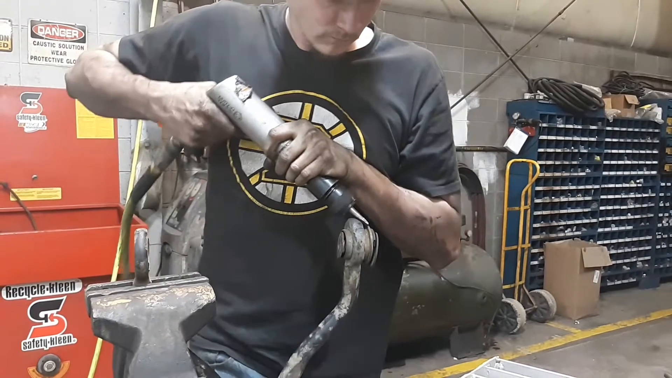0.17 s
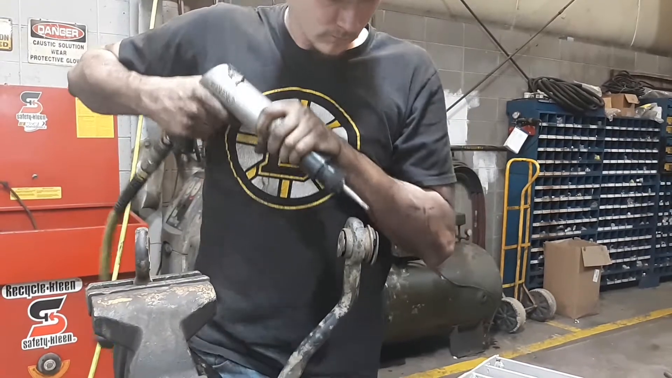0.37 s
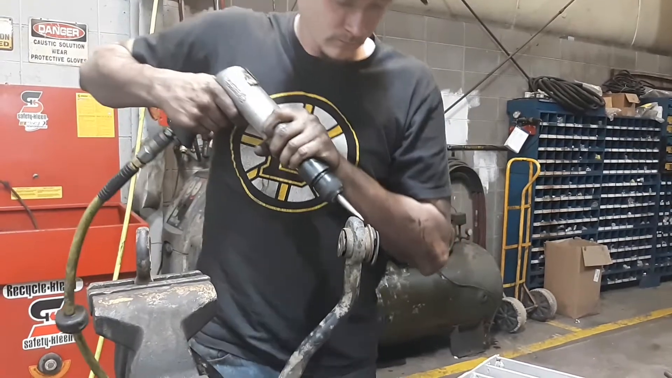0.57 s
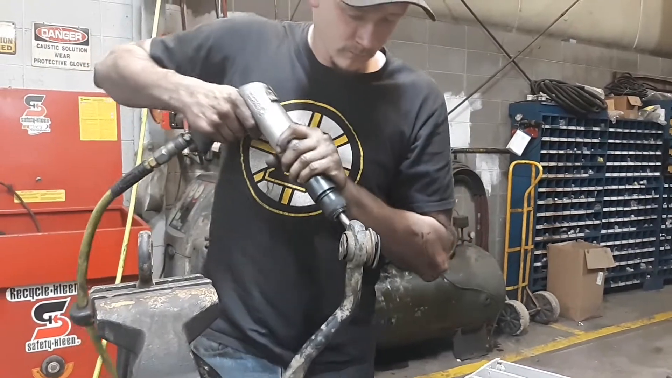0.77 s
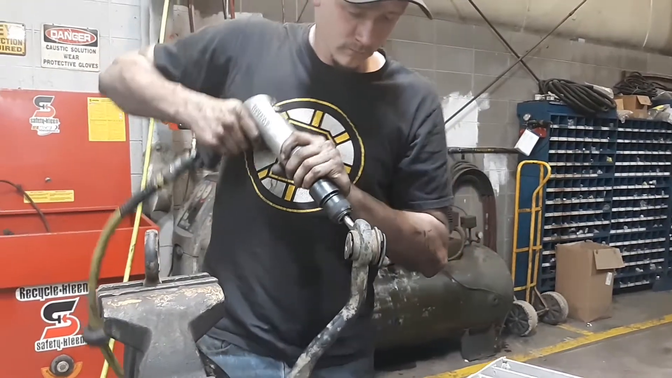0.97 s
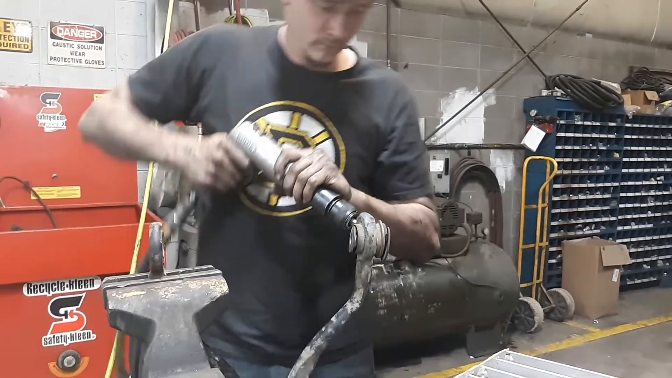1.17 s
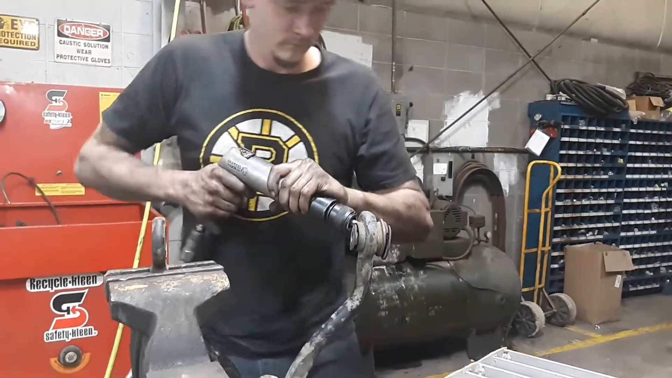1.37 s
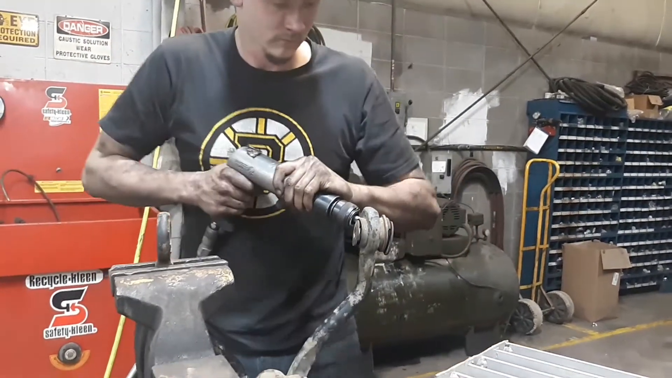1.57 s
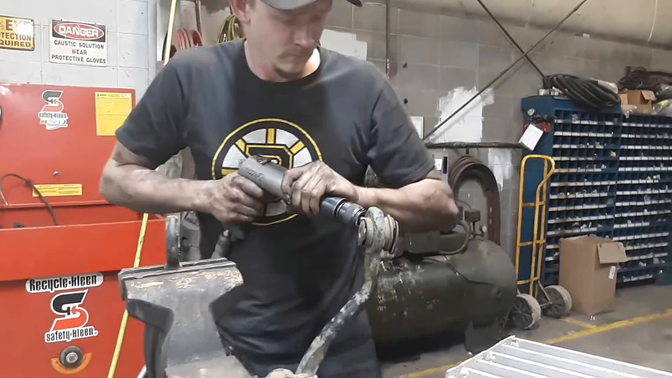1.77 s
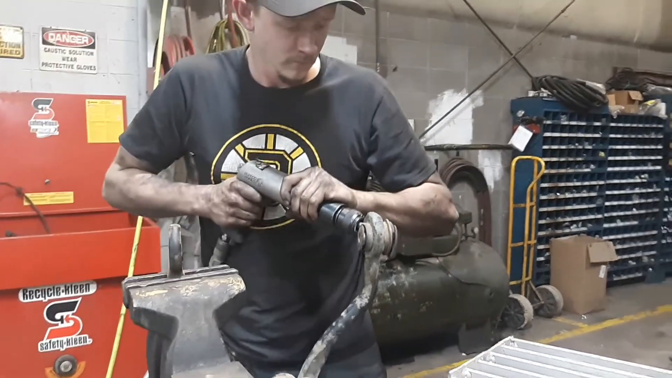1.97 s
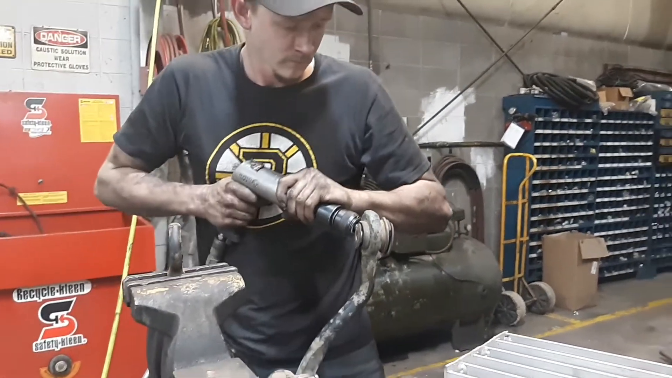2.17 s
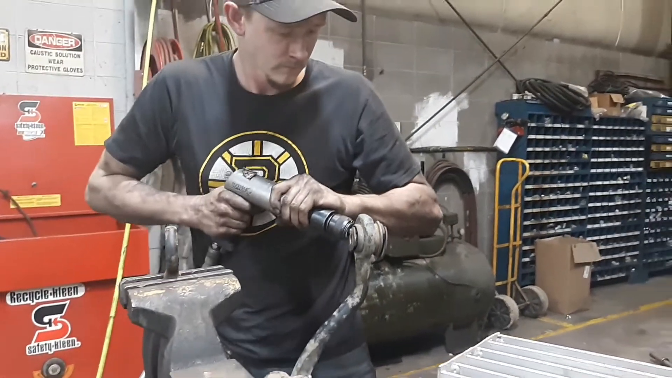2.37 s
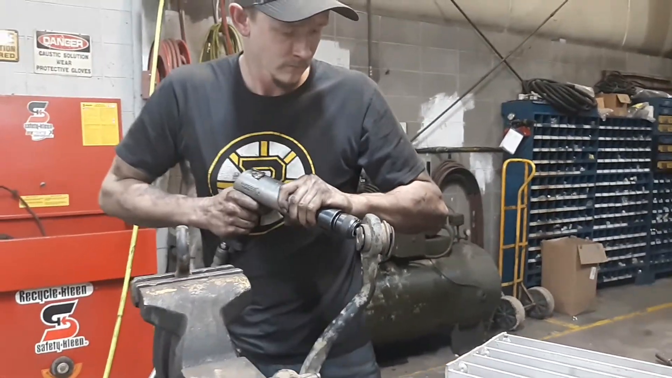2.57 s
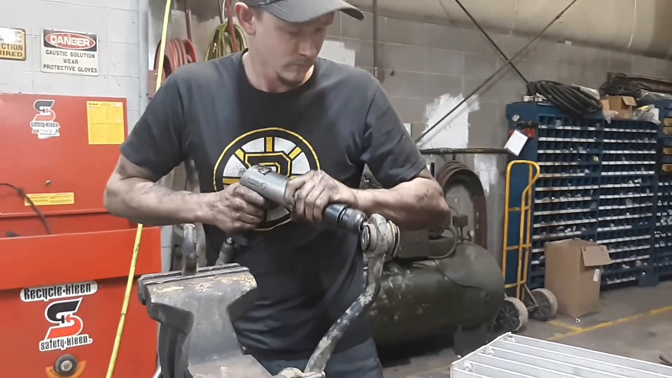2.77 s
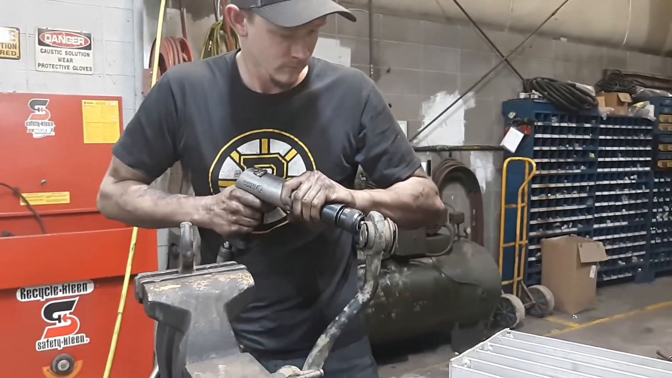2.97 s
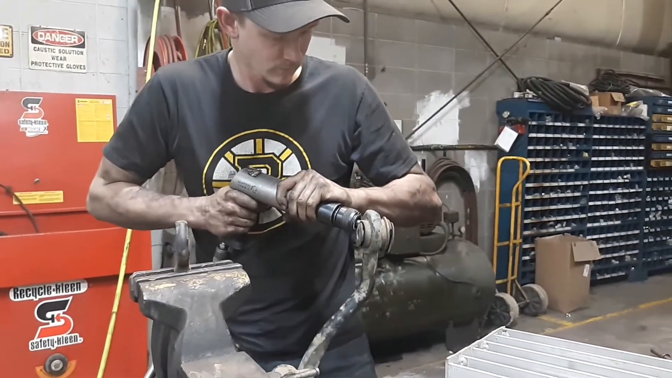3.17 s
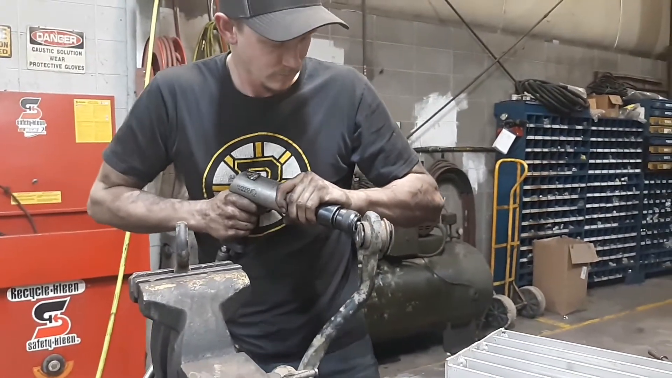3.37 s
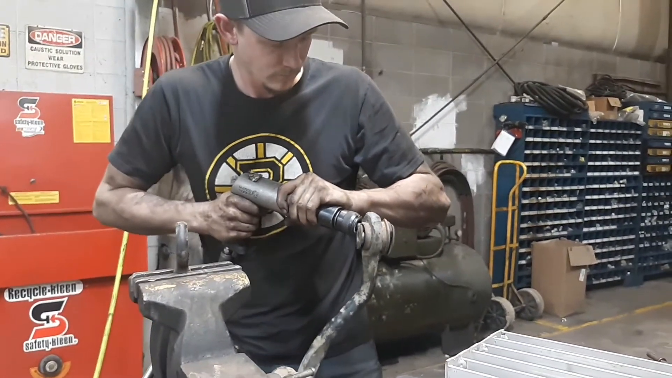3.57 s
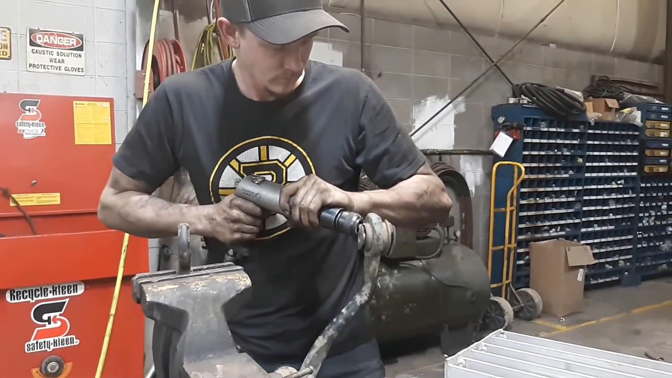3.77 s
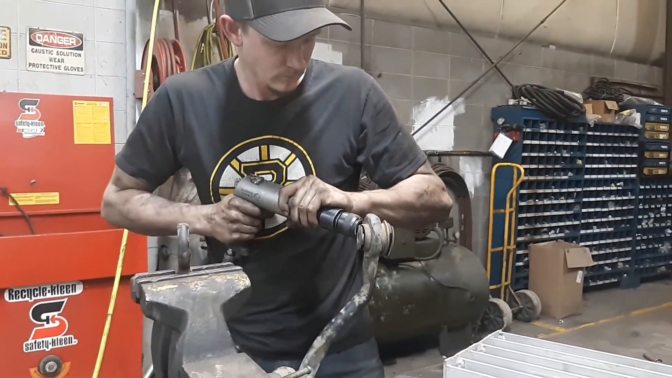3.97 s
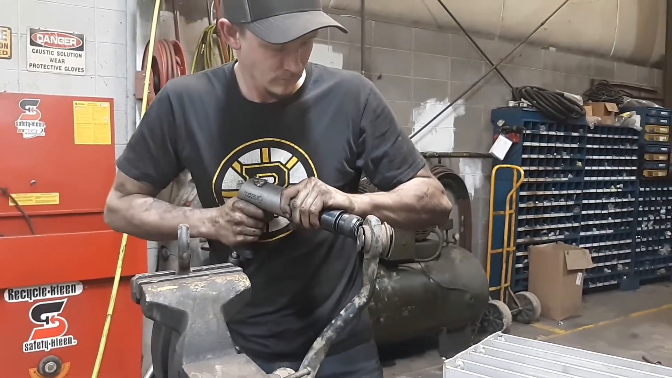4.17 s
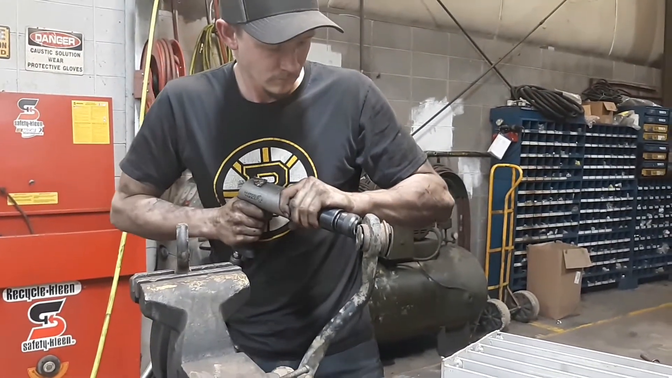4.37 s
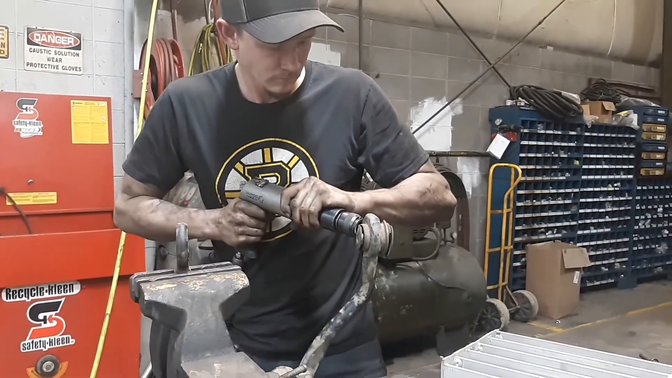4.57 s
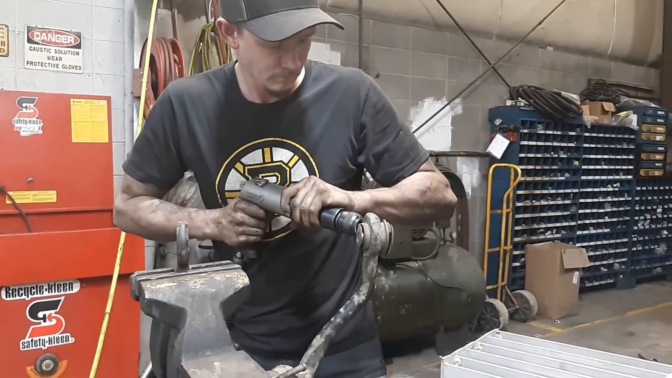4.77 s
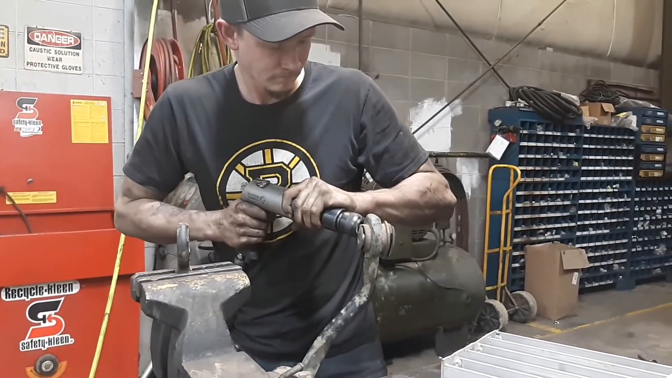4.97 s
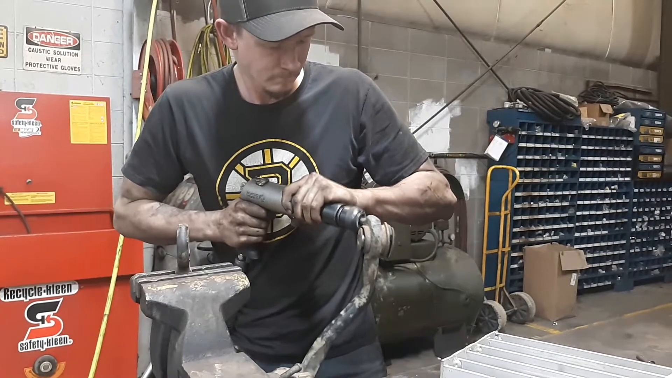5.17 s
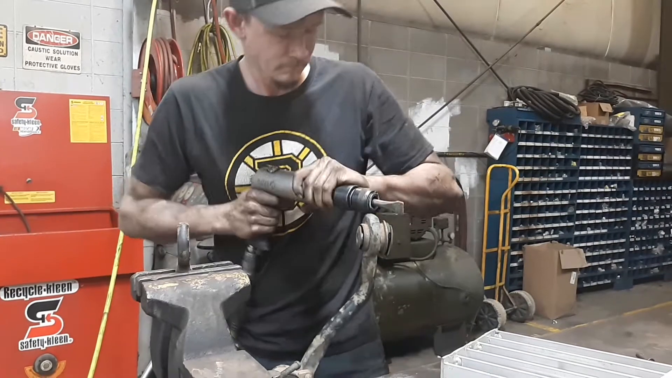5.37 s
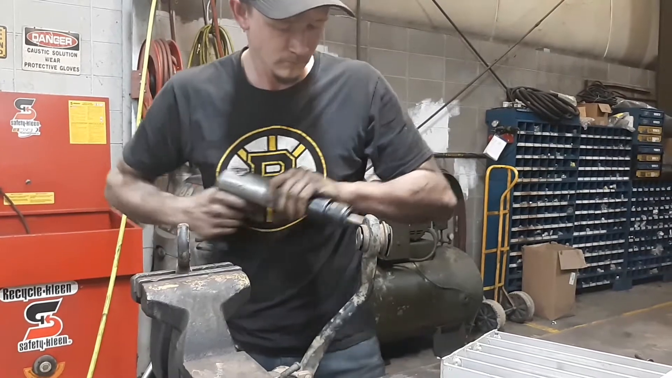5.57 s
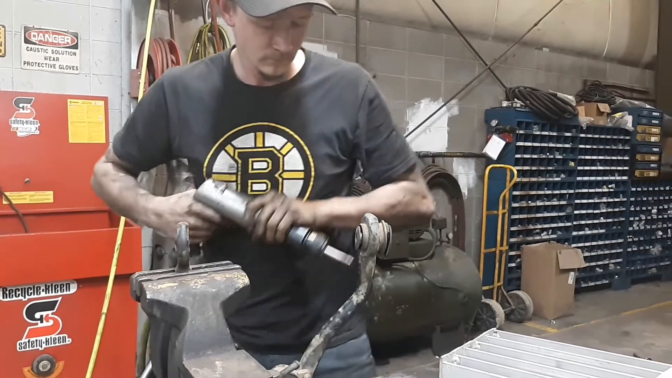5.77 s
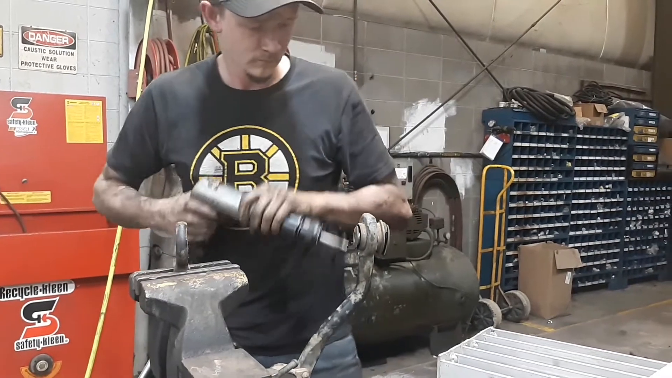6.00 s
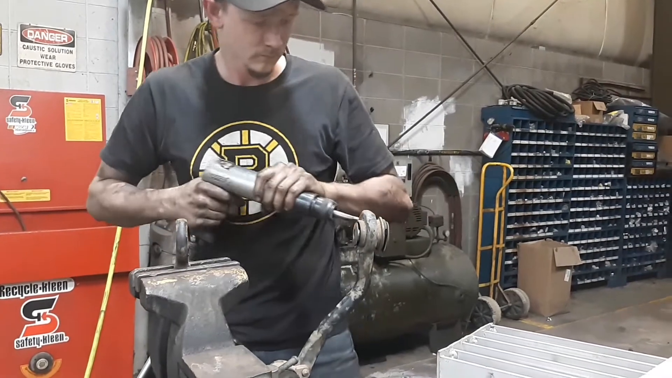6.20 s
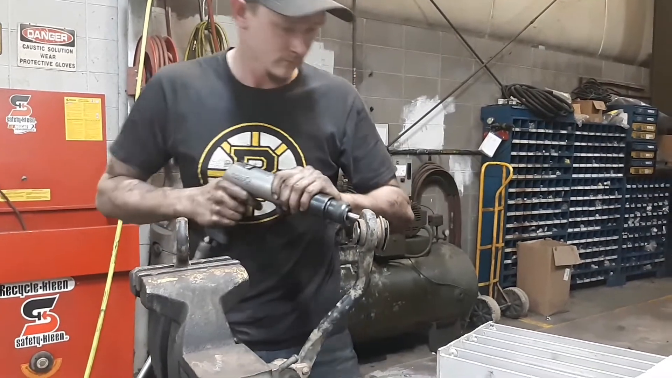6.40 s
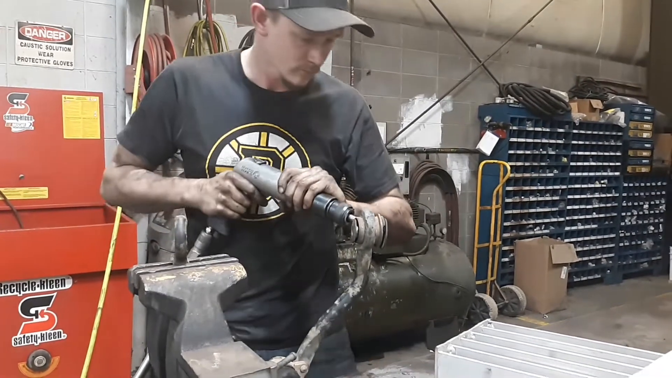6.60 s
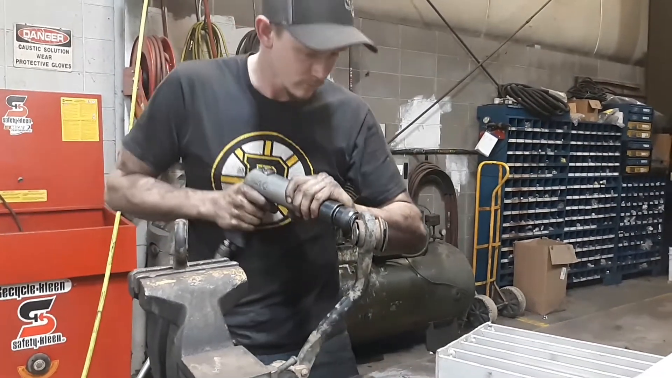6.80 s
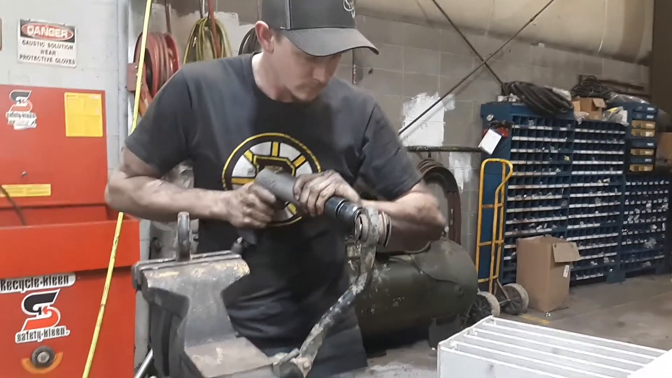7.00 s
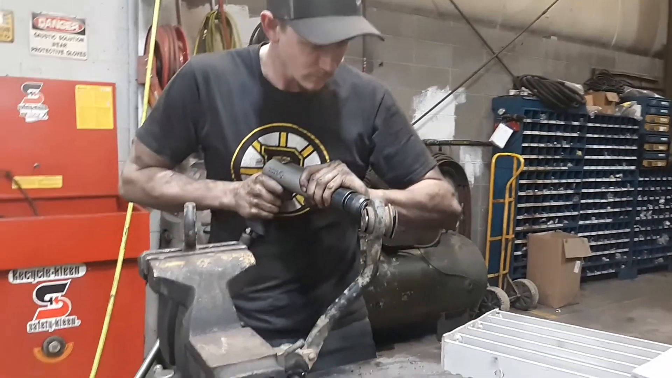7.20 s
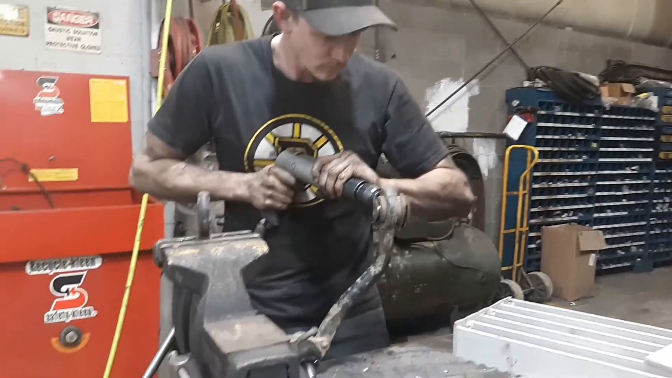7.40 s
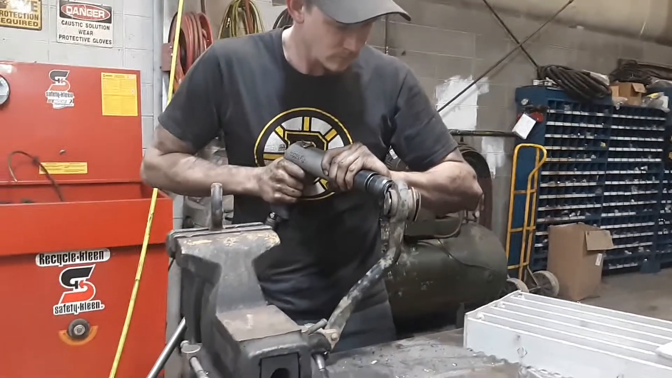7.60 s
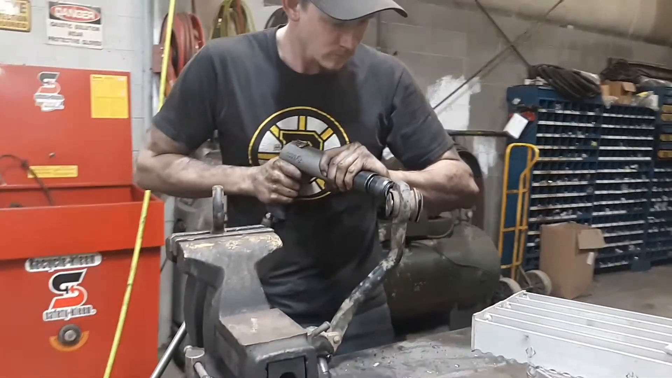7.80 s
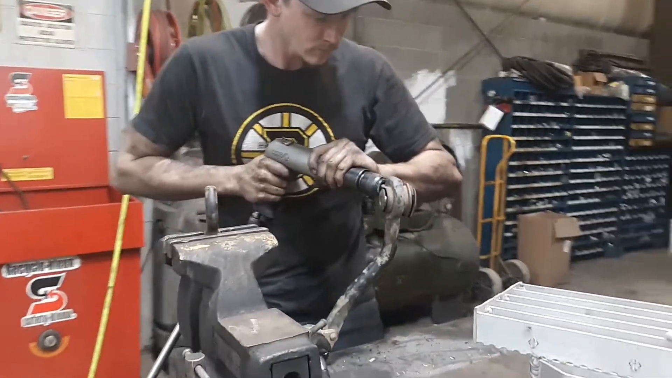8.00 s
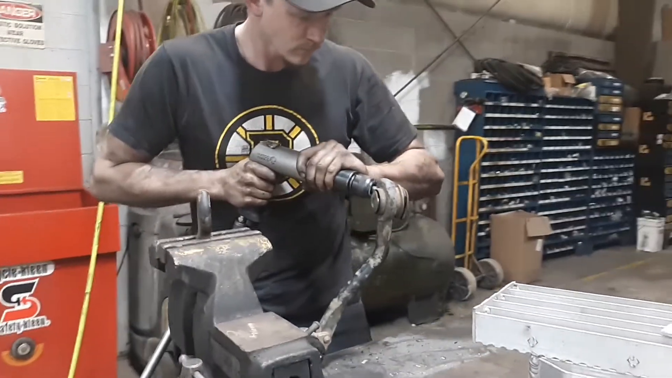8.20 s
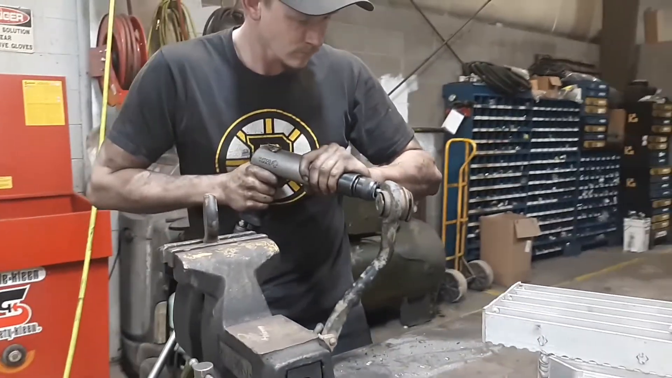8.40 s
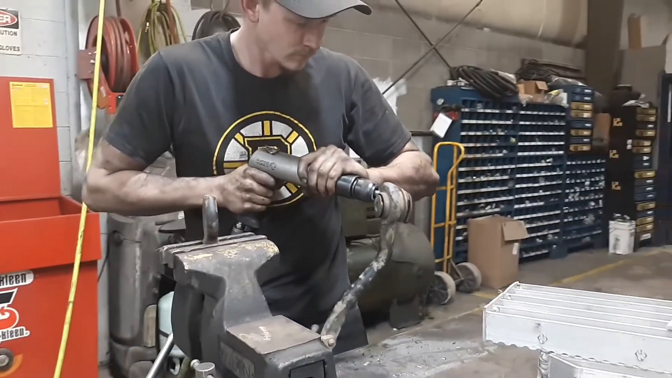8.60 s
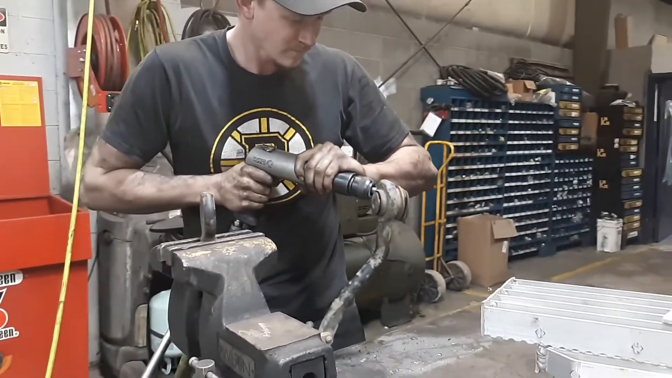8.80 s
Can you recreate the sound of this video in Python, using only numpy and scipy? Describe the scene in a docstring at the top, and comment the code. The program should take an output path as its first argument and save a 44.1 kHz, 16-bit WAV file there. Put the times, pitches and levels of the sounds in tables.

```python
"""Air hammer in a garage

An air hammer drives a worn bushing out of a steel control arm held in a vice, in runs of about 33 blows
a second. Each impact cracks, excites the modes of the chisel and, once the chisel bites, of the arm; a
puff of exhaust follows. Hard walls reverberate. Between runs the chisel is set back on the steel, and
after a second of quiet the camera's gain control lifts the hum of the shop and a thin whistle."""
import sys
import numpy as np
from scipy import signal
from scipy.fft import rfft, irfft, next_fast_len
from scipy.io import wavfile
from scipy.ndimage import uniform_filter1d, minimum_filter1d, map_coordinates

SR = 44100
rng = np.random.default_rng(int(sys.argv[2]) if len(sys.argv) > 2 else 0)


def persist_wave(psi):
    """Save psi, clipped to +-1, as 16-bit WAV."""
    counts = np.round(np.clip(psi, -1, 1) * 32767).astype(np.int16)
    wavfile.write(sys.argv[1], SR, np.atleast_2d(counts).T)


N = 390285
TIME = np.arange(N) / SR
AGE = np.arange(SR // 6) / SR  # seconds since a blow


# Volleys of blows. Each row: first and last blow in seconds, blows per second, share by which the stroke
# lengthens, force in dB, bite from 0 (running free) to 1 (hard on the steel), first and last ring in dB.
VOLLEYS = [(0.002, 0.058, 35, 0, -13.5, .88, -25, -25), (1.889, 1.965, 29, -.3, -13.5, 0, -20, -20),
           (1.981, 2.012, 27, 0, -14.5, 0.8, -34.5, -35), (2.041, 2.194, 26, -.06, -16, .98, -24, -27),
           (2.227, 2.326, 30, 0, -18, .92, -13, -12), (3.212, 3.272, 32, 0, -21, .2, -31, -36),
           (3.301, 3.358, 33, 0, -17.5, .83, -17, -20), (3.391, 3.391, 33, 0, -21, .1, -36, -36),
           (3.421, 3.907, 33, 0, -16.8, .86, -13, -9), (4.278, 4.343, 30, -.3, -21.5, 0.03, -26.5, -28),
           (4.363, 4.64, 31, .24, -18, .87, -7, -17), (4.695, 4.67, 33, 0, -21, .15, -29, -29),
           (4.720, 4.84, 33, 0, -16, .83, -8.5, -9), (4.783, 5.22, 35, 0, -16.5, .87, -7, -15.5),
           (5.240, 5.269, 35, 0, -18, .55, -31, -34), (7.402, 7.476, 28, -.3, -15.2, 0.05, -24, -29),
           (7.494, 7.55, 25, .7, -14, 0.99, -1, -11), (7.740, 7.85, 32, 0, -21, 0.01, -32, -23),
           (7.857, 8.12, 28, -.04, -16.3, .9, -13, -14), (8.145, 8.79, 35, -.02, -15.6, .88, -17, -15)]
# Kicks of the piston after the trigger is let go. Each row: time in seconds, force in dB.
AFTER_KICKS = [(0.134, -32.5), (2.382, -27.5), (5.291, -20), (5.330, -22), (5.400, -31)]
# Standard deviations from blow to blow, in dB: crack, chisel ring, clang, exhaust.
SCATTER_DB = [1.5, 2.5, 1.2, 1.3]

def piston():
    """A nearly periodic impact train. Each row: time in seconds, then crack, ring, clang, air in dB."""
    kicks = [(s, db, db - 14, db - 16, db - 23) for s, db in AFTER_KICKS]
    blows = np.vstack([volley(*row) for row in VOLLEYS] + kicks)
    blows = blows[np.argsort(blows[:, 0])]
    valve_shut = np.diff(blows[:, 0], append=N / SR) > .052  # less air escapes before a pause
    blows[:, -1] -= 11 * valve_shut
    jitter_s = .0004
    return blows + rng.standard_normal(blows.shape) * [jitter_s, *SCATTER_DB]


def volley(first, last, rate, slowing, force_db, bite, ring_first_db, ring_last_db):
    """Mechanical coupling: the harder the chisel bites, the more the arm clangs and the less air escapes."""
    progress = np.linspace(0, 1, 1 + round(abs(last - first) * rate))
    times = first + (last - first) * (progress + slowing * progress * (progress - 1) / 2)
    from_rest = (progress == 0) * (1 - bite)  # a free piston's first stroke is weaker
    crack_db = force_db - 6 * from_rest
    ring_db = ring_first_db + (ring_last_db - ring_first_db) * progress
    clang_db = force_db - 30 + 29 * bite
    air_db = force_db + 1 - 7.8 * bite - 3 * from_rest
    return np.column_stack(np.broadcast_arrays(times, crack_db, ring_db, clang_db, air_db))


# Spectrum of the impact. Each row: frequency in Hz, relative density in dB.
CRACK_SPECTRUM = [(100, -31.5), (300, 5.5), (800, -10), (1600, -3), (2500, -3.5), (4200, 0.5), (6500, -2),
                  (7800, -9.5), (9600, -7), (11000, -9), (13000, -6), (16000, -23)]
# Shank note, freed when the chisel sits askew. Each row: time in seconds, relative level in dB.
SHRILL_LEVEL = [(0, -21), (2.2, -2.5), (5.3, -14), (7.75, -10), (7.95, 4), (8.45, -3.5), (8.8, -10)]

def cracks(blows):
    """Brief contact gives a broad spectrum: the piston hits the shank and taps again on the rebound."""
    times, db = blows.T[:2]
    strike = place(times, db + 10, bursts(CRACK_SPECTRUM, times) * fade(attack=.00055, t60=.033))
    rebound = place(times + .018, db - 9.5, bursts(CRACK_SPECTRUM, times) * fade(attack=.0005, t60=.014))
    shrill_hz = 9700 * (1 + .012 * rng.standard_normal((len(times), 1)))
    shrill = np.sin(2 * np.pi * shrill_hz * AGE) * fade(attack=.0019, t60=.048)
    return strike + rebound + place(times, db + curve(SHRILL_LEVEL, times) + 3.5, shrill)


# The chisel's main note, higher when pressed in deep. Each row: time in seconds, frequency in Hz.
CHISEL_PITCH = [(0, 3890), (2.3, 4010), (3.4, 3965), (5.2, 3961), (7.5, 3952), (8.0, 4080), (8.8, 4082)]
# The note is choked sooner as the tip sinks in. Each row: time in seconds, lifetime in seconds.
CHISEL_LIFE = [(2.3, .007), (5.2, .0075), (7.5, .007), (8.05, .006), (8.3, .004), (8.85, .004)]
# Modes of the chisel. Each row: multiple of the main note, relative level in dB.
CHISEL_MODES = [(1, 2), (2.44, -23), (3.24, -30.5)]

def chisel(blows):
    """Longitudinal vibration of a bar: each blow starts it, and contact with the bushing damps it."""
    times, _, db = blows.T[:3]
    detune, grip = rng.standard_normal((len(times), 2)).T[:, :, None]
    hz = curve(CHISEL_PITCH, times)[:, None] * (1 + .007 * detune)
    life_s = curve(CHISEL_LIFE, times)[:, None] * np.exp(.15 * grip)
    envelope = np.exp(-(AGE / life_s) ** 3) * (1 - np.exp(-AGE / .0008))
    ring = sum(amp(level) * np.sin(2 * np.pi * ratio * hz * AGE) for ratio, level in CHISEL_MODES)
    return place(times, db + 7.7, ring * envelope)


# Modes of arm and vice. Each row: frequency in Hz, relative level in dB, 60 dB decay time in seconds.
ARM_MODES = [(466, -9.5, .05), (650, -15.5, 0.016), (857, -5.5, .05), (921.3, -0.5, .07), (1007, -4, 0.084),
             (1123, -13, 0.062), (1238, -13.5, .05), (1402, -4, 0.032), (1623, -3.5, 0.045),
             (1739, -7, 0.06)]
# How freely the arm rings in the vice. Each row: time in seconds, gain in dB.
ARM_FREEDOM = [(0, -15.5), (2.1, -1), (8.0, 0.5), (8.8, -3)]
# Spectrum of chattering steel. Each row: frequency in Hz, relative density in dB.
CLATTER_SPECTRUM = [(40, -45), (110, -24.5), (200, -14), (480, -6), (700, -3), (950, 1.5), (1700, -3),
                    (2200, -5.5), (3300, -1.5), (6000, -23.5), (12000, -33)]

def control_arm(blows):
    """Damped modal vibration: the arm's clang and chatter are heard a few milliseconds after each blow."""
    times, _, _, db = blows.T[:4]
    clang = 0
    for k, (hz, level, t60) in enumerate(ARM_MODES):
        strength, detune = rng.standard_normal((len(times), 2)).T[:, :, None]
        mode = (-1) ** k * np.sin(2 * np.pi * hz * (1 + .014 * detune) * AGE)
        clang = clang + amp(level + 2.22 * strength) * fade(.0011, t60) * mode
    chatter = bursts(CLATTER_SPECTRUM, times) * fade(attack=.0017, t60=.074)
    lag_s = .008 + .002015 * rng.standard_normal(len(times))
    clang_db = db + curve(ARM_FREEDOM, times) + 5
    return place(times + lag_s, clang_db, clang) + place(times + .003, db + 7.5, chatter)


# Spectra of the exhaust's hiss, thump and shriek. Each row: frequency in Hz, relative density in dB.
HISS_SPECTRUM = [(40, -61.5), (130, -18), (260, -9.5), (450, -15), (900, -18.5), (1400, -12), (2600, -6),
                 (4200, 5.5), (5300, -3), (6600, -0.5), (7700, -19.5), (9400, -13), (12000, -9.5),
                 (16000, -8.5)]
THUMP_SPECTRUM = [(40, -46), (90, -23), (170, -1), (260, 6.5), (400, -5), (700, -18.5), (2000, -44.5)]
JET_SPECTRUM = [(1500, -32.5), (2800, -13.5), (3400, -8.5), (4300, 1.5), (5500, -2.5), (6500, -2),
                (7500, -23), (12000, -23)]

def exhaust(blows):
    """Pulsed jet noise: the ports open with a thump on the return stroke and hiss until they close."""
    times, _, _, _, db = blows.T
    gap_s = np.diff(times, append=np.inf)
    stroke_s = np.where(gap_s < .05, gap_s, .03)[:, None]
    port_open = np.clip(AGE / .003, 0, 1) * np.clip((stroke_s - .004 - AGE) / .003, 0, 1)
    hiss = bursts(HISS_SPECTRUM, times) * port_open
    thump = bursts(THUMP_SPECTRUM, times) * fade(attack=.0025, t60=.029)
    jet = bursts(JET_SPECTRUM, times) * port_open
    jet_db = np.minimum(2 * db + 13, -16)  # grows faster than the flow, so a free piston shrieks
    return place(times, db + 3, hiss) + place(times, db + .5, thump) + place(times, jet_db, jet)


def loose_steel():
    """Free vibration: loose steel sings on after the second run and fades unevenly."""
    age = np.maximum(TIME - 2.293, 0)
    flutter = amp(4 * wobble(40))
    return amp(-35) * flutter * np.sin(2 * np.pi * 5453 * age) * fade(attack=.003, t60=.7, t=age)


# The tool is set on the work. Each row: time in seconds, relative levels of click, clank, knock in dB.
TAPS = [(0.532, -57, -75, -78), (0.616, -58, -75, -78), (1.095, -64, -54, -67), (1.158, -43, -55, -48),
        (1.183, -48, -49, -49), (1.535, -63, -65, -45), (2.848, -49.5, -54, -57), (6.412, -71, -52, -59),
        (6.658, -50, -46.5, -65), (6.705, -42.5, -45, -46), (6.739, -41, -40, -56),
        (6.816, -55.5, -62, -65), (7.314, -75, -58, -54)]
# Spectra of the click and the knock. Each row: frequency in Hz, relative density in dB.
CLICK_SPECTRUM = [(200, -28.5), (1000, -0.5), (2200, -4), (3700, 5.5), (5200, -4.5), (6500, -5),
                  (8000, -20.5), (10000, -12.5), (16000, -31)]
KNOCK_SPECTRUM = [(50, -37.5), (170, -5), (350, -3), (650, -0.5), (1100, -17.5), (2000, -25), (6000, -48)]

def taps():
    """Light contacts excite short transients: a steel click, a clank and a dull knock of the arm."""
    times, click_db, clank_db, knock_db = np.transpose(TAPS)
    click = place(times, click_db + 6.5, bursts(CLICK_SPECTRUM, times) * fade(attack=.0004, t60=.022))
    clank = place(times, clank_db + 2.5, bursts(CLATTER_SPECTRUM, times) * fade(attack=.001, t60=.06))
    knock = place(times, knock_db - 2.5, bursts(KNOCK_SPECTRUM, times) * fade(attack=.0023, t60=.35))
    return click + clank + knock


# A thin whistle. Each row: time in seconds, level in dB.
WHISTLE_LEVEL = [(0.6, -71), (1.0, -66), (1.7, -62.5), (3.2, -63.5), (5.9, -78), (6.87, -66.5), (7.08, -68),
                 (7.16, -79)]

def whistle():
    """Random modulation of phase and amplitude makes two faint, high tones waver."""
    upper = np.sin(2 * np.pi * 2450 * TIME + .35 * wobble(24))
    lower = amp(-16) * np.sin(2 * np.pi * 2256 * TIME + .4 * wobble(14))
    return (upper + lower) * np.sqrt(2) * amp(curve(WHISTLE_LEVEL) + 1.6 * wobble(16))


# Seeping air, and a finer fizz before the second run. Each row: time in seconds, level in dB.
SEEP_LEVEL = [(1.1, -77), (1.45, -70), (1.9, -77), (6.3, -77), (6.7, -65.5), (6.98, -79), (7.04, -63.5),
              (7.4, -69)]
FIZZ_LEVEL = [(1.45, -70.5), (1.56, -92)]
# Their spectra. Each row: frequency in Hz, relative density in dB.
SEEP_SPECTRUM = [(500, -26.5), (2500, -11), (4500, 1.5), (5600, -12.5), (6700, -7.5), (7700, -32),
                 (9300, -6.5), (11000, -29.5), (16000, -23.5)]
FIZZ_SPECTRUM = [(5000, -26), (6500, -2.5), (8000, -18), (12000, 2), (15000, -2.5), (16000, -8.5)]

def leaks():
    """Flow noise: air leaking from the tool hisses faintly."""
    seep = amp(curve(SEEP_LEVEL)) * noise(SEEP_SPECTRUM, 2, N)
    fizz = amp(curve(FIZZ_LEVEL)) * noise(FIZZ_SPECTRUM, 2, N)
    return seep + fizz


# Spectrum of the ventilation. Each row: frequency in Hz, relative density in dB.
VENT_SPECTRUM = [(30, -19), (80, -16), (120, -19.5), (160, -6.5), (230, -3), (400, -8), (700, -11),
                 (1300, -17.5), (2600, -15.5), (4300, -23.5), (6500, -29.5), (8000, -37.5), (12000, -36.5),
                 (16000, -37)]
# Partials of a shop motor. Each row: frequency in Hz, relative level in dB.
MOTOR_PARTIALS = [(153, -15.5), (230, -6), (306, -12), (382, -11), (458, -14), (609, -17.5)]

def shop():
    """A line spectrum over a continuous one: a motor hums above steady ventilation noise."""
    left, right, common = noise(VENT_SPECTRUM, 3, N)
    ventilation = .75 * (np.array([left, right]) + common)
    hum = 0
    for hz, db in MOTOR_PARTIALS:
        amplitude = np.sqrt(2) * amp(db + 2 * wobble(6))
        hum += amplitude * np.sin(2 * np.pi * hz * TIME + .6 * wobble(8))
    return amp(-61.5) * (ventilation + hum)


# Reverberation of the garage. Each row: frequency in Hz, 60 dB decay time in seconds.
GARAGE_DECAY = [(80, 0.28), (300, .55), (1000, 0.62), (2000, 0.82), (3200, 0.9), (4200, 0.74), (6000, 0.53),
                (9000, 0.43), (15000, 0.1)]

def garage(x, wet_db, pan_db, lead_ms):
    """Direct and diffuse fields: sound reaches the left microphone first, then the walls return a tail."""
    hz, t, spectra = signal.stft(rng.standard_normal((2, SR)), SR, nperseg=256)
    decay = amp(-60 * t / along(GARAGE_DECAY, hz)[:, None])
    tail = signal.istft(spectra * decay, SR, nperseg=256)[1]
    age = np.arange(tail.shape[1]) / SR
    early_cluster = 1 + 1.3 * np.exp(-age / .02)  # from bench, floor and cabinet
    tail *= np.clip((age - .002) / .006, 0, 1) * early_cluster / np.sqrt(SR * .09)
    wet = signal.fftconvolve(np.atleast_2d(x), tail, axes=1)[:, :N]
    sides = np.array([[1], [-1]])
    direct = filtered(x, lambda f: np.exp(1j * np.pi * f * sides * lead_ms / 1000))
    return direct * unit(amp(sides * pan_db / 2)) + amp(wet_db) * wet


def amp(db):
    """Decibels to amplitude ratio."""
    return 10 ** (np.asarray(db) / 20)


def unit(x):
    """Normalisation to rms 1."""
    return x / np.sqrt(np.mean(x ** 2) + 1e-20)


def along(points, hz):
    """Interpolation of (Hz, value) rows on a logarithmic frequency axis."""
    frequencies, values = np.transpose(points)
    return np.interp(np.log(hz + 1), np.log(frequencies), values)


def curve(rows, t=TIME):
    """Linear interpolation of (seconds, value) rows."""
    return np.interp(t, *np.transpose(rows))


def wobble(rate):
    """A spline through random knots, rate of them a second."""
    return map_coordinates(rng.standard_normal(int(N * rate / SR) + 4), [TIME * rate / SR])


def filtered(x, response):
    """Linear filtering: the spectrum is multiplied by a complex frequency response."""
    size = x.shape[-1]
    padded = next_fast_len(size + 2048)
    return irfft(rfft(x, padded) * response(np.fft.rfftfreq(padded, 1 / SR)), padded)[..., :size]


def noise(spectrum, count, size):
    """Rows of spectrally shaped noise of rms 1."""
    return unit(filtered(rng.standard_normal((count, size)), lambda hz: amp(along(spectrum, hz))))


def bursts(spectrum, times):
    """A short, independent row of noise for each event."""
    return noise(spectrum, len(times), len(AGE))


def fade(attack, t60, t=AGE):
    """A quick rise and an exponential decay of 60 dB in t60 seconds."""
    return (1 - np.exp(-t / attack)) * amp(-60 * t / t60)


def place(times, db, sounds):
    """Superposition of one row of sound at each time and level."""
    index = np.round(np.maximum(times, 0) * SR).astype(int)[:, None] + np.arange(sounds.shape[-1])
    return np.bincount(index.ravel(), (amp(db)[:, None] * sounds).ravel(), N)[:N]


def scene():
    """Sound pressures add: tool and work, each placed in the room, over the background of the shop."""
    blows = piston()
    # the crack scatters off hands and steel and reaches each microphone differently
    tool = garage(np.array([cracks(blows), cracks(blows)]), wet_db=-2.5, pan_db=2.2, lead_ms=.1)
    tool += garage(exhaust(blows), wet_db=-5.5, pan_db=-3.8, lead_ms=.11)
    tool += garage(chisel(blows), wet_db=-11, pan_db=-38, lead_ms=.063)
    work = amp(-.5) * garage(control_arm(blows), wet_db=2, pan_db=-.5, lead_ms=.094)
    work += garage(taps(), wet_db=-2.5, pan_db=-2, lead_ms=.02) + loose_steel()
    return tool + work + shop() + whistle() + leaks()


def gain_control(x, loud_db=-25.5, hold_s=1.04, recover_s=.25, max_lift_db=18.5):
    """Automatic gain control: the gain drops at once on a loud sound, waits, then creeps back up."""
    power = uniform_filter1d(np.mean(x ** 2, axis=0), size=441)
    last_loud_s = np.maximum.accumulate(np.where(power > amp(loud_db) ** 2, TIME, 0))
    rising_s = np.maximum(TIME - last_loud_s - hold_s, 0)
    lift_db = max_lift_db * (1 - np.exp(-rising_s / recover_s))
    return x * amp(uniform_filter1d(lift_db, size=221))


def limiter(x, top_db):
    """Peak limiting: the gain ducks for a few milliseconds around each peak above top_db."""
    safe_gain = np.minimum(1, amp(top_db) / (np.abs(x).max(axis=0) + 1e-9))
    return x * uniform_filter1d(minimum_filter1d(safe_gain, size=161), size=121)


def record(dry):
    """Band limiting and compression: the camera thins the bass, rides its gain and cuts the top treble."""
    bass_hz, top_hz = 50, 16050
    thinned = filtered(dry, lambda hz: 1j * hz / (1j * hz + bass_hz))
    held = limiter(gain_control(thinned), top_db=-.5)
    return filtered(held, lambda hz: np.clip((top_hz - hz) / 300 + .5, 0, 1))


dry = scene()
out = record(dry)
persist_wave(out)
```